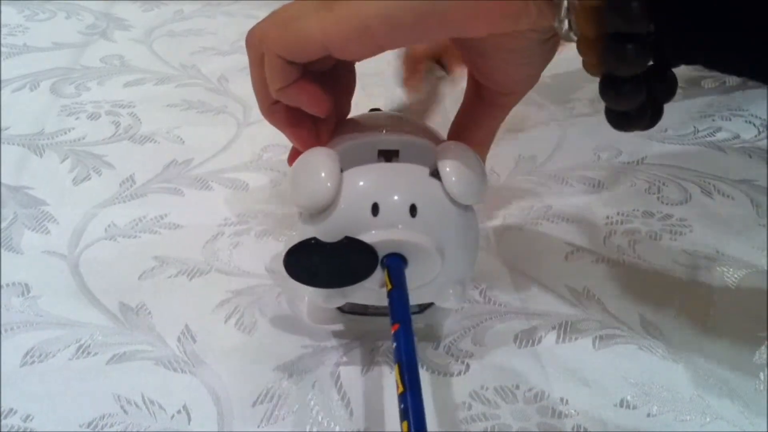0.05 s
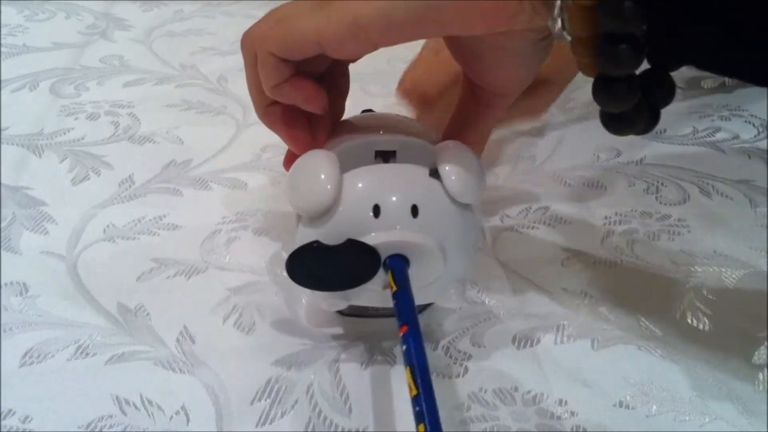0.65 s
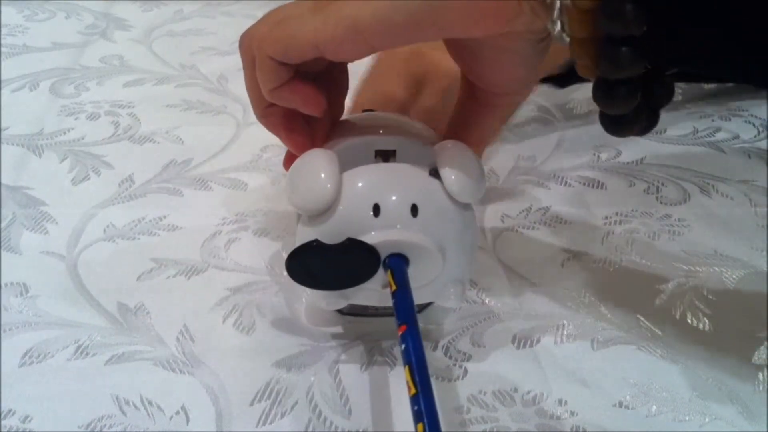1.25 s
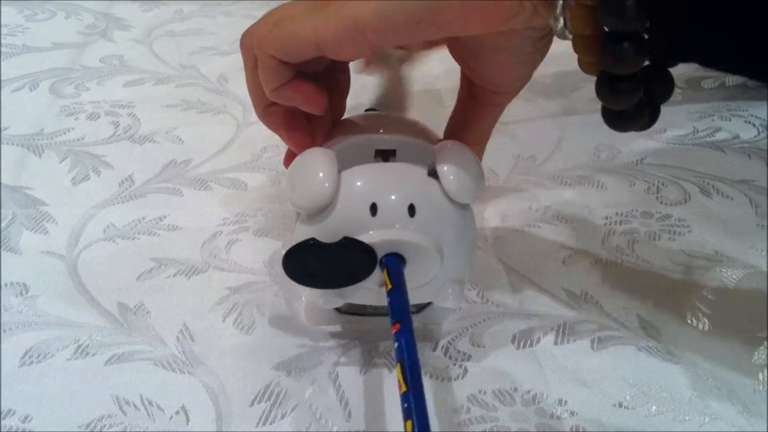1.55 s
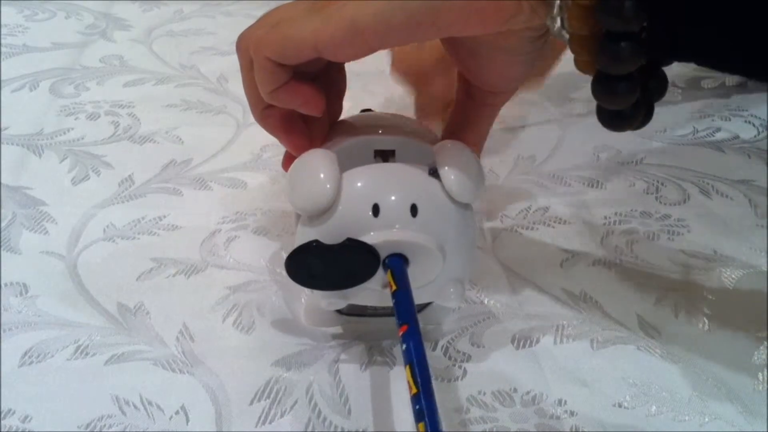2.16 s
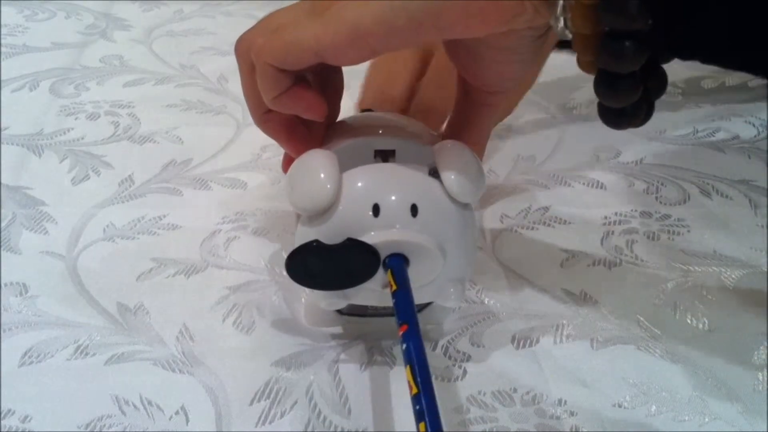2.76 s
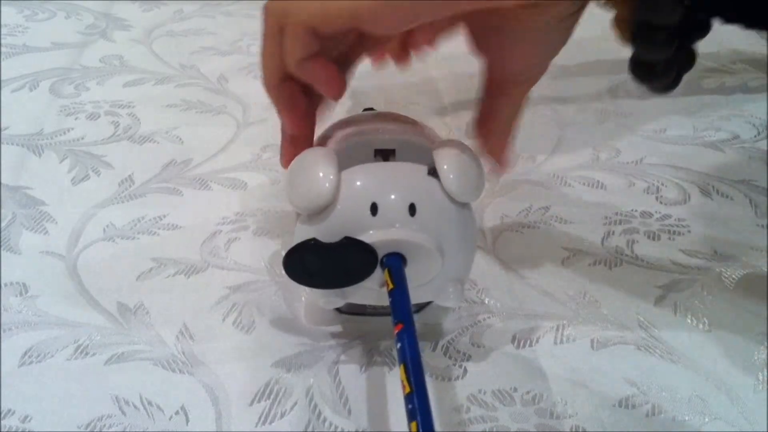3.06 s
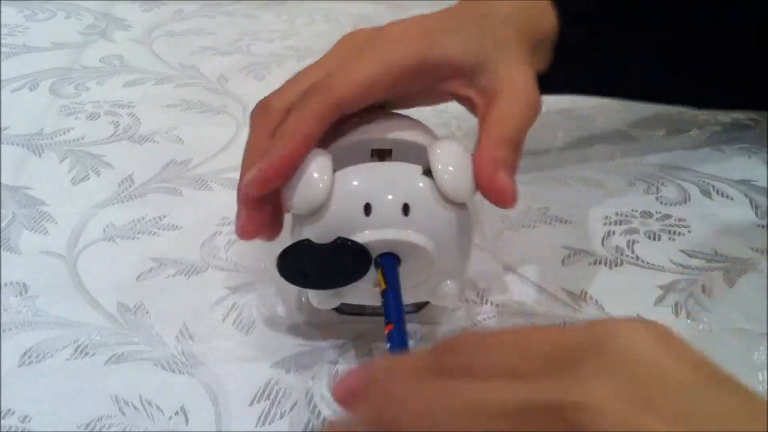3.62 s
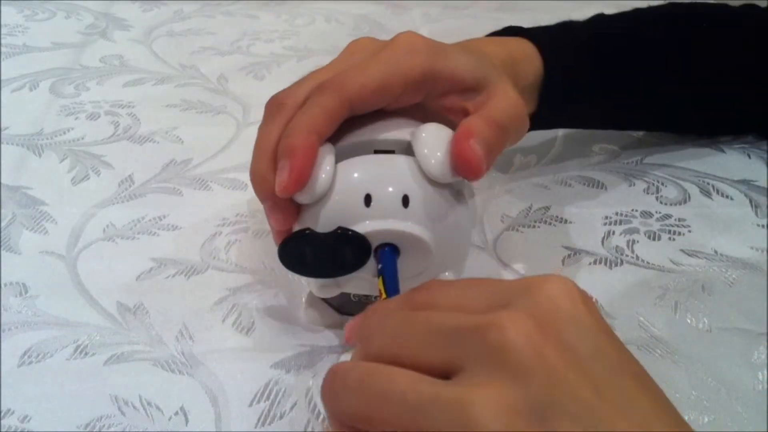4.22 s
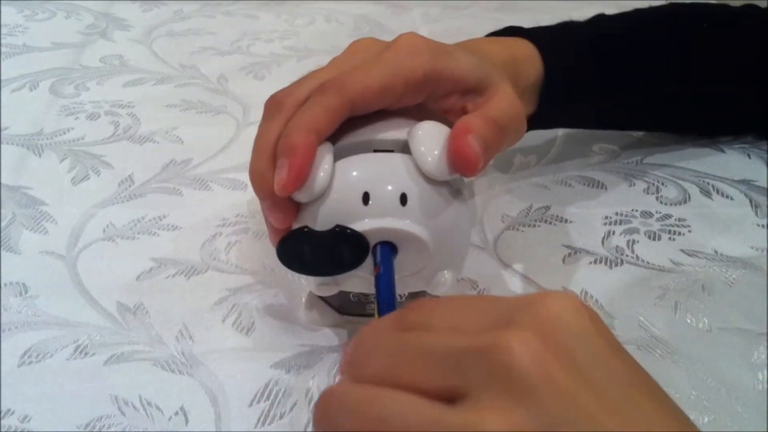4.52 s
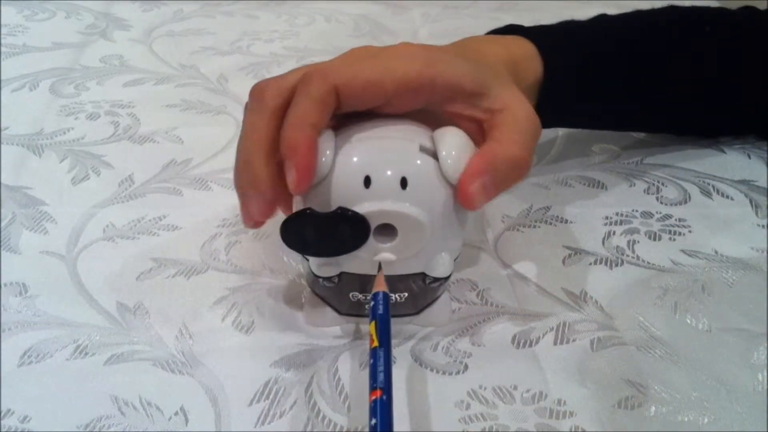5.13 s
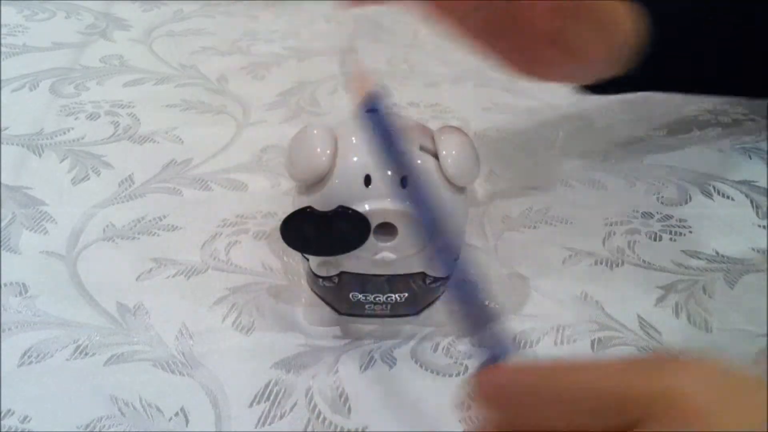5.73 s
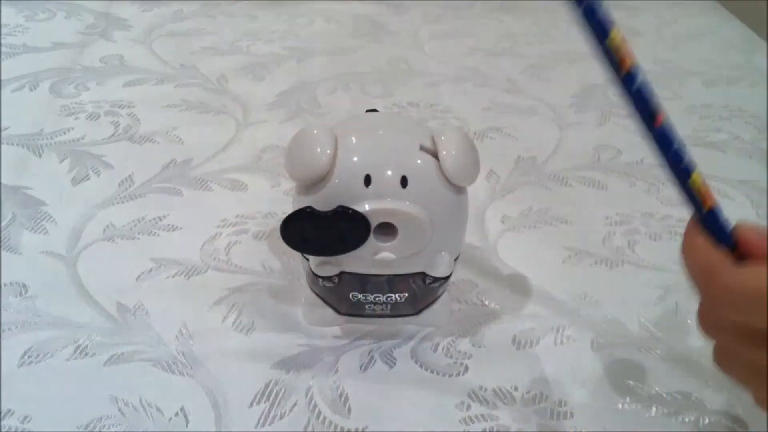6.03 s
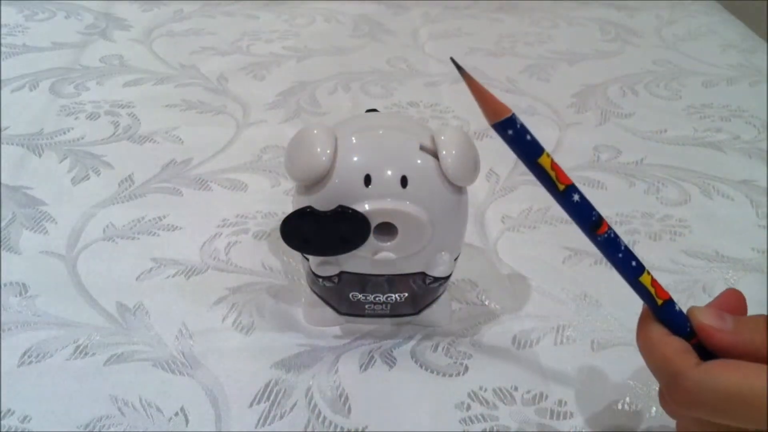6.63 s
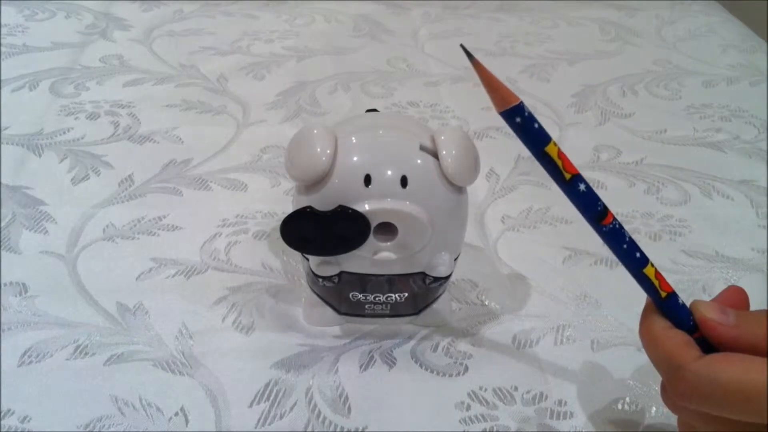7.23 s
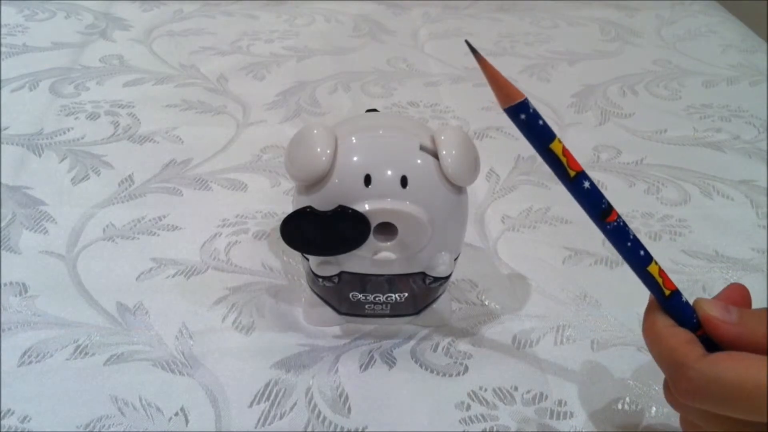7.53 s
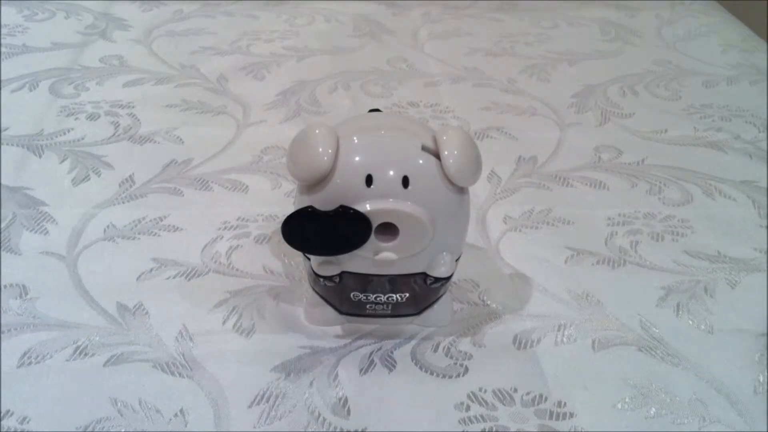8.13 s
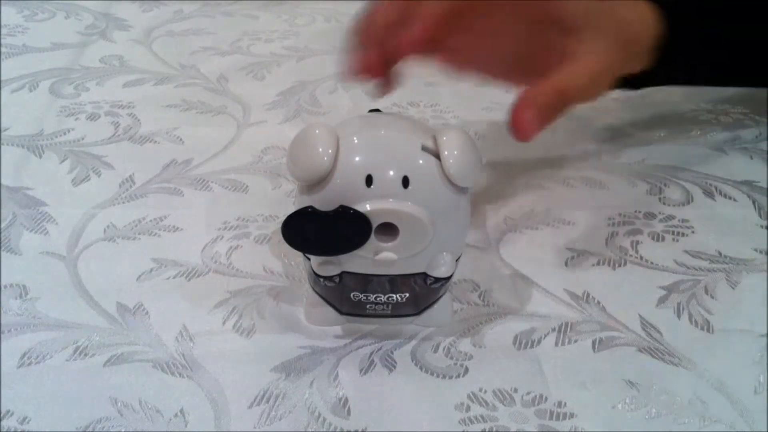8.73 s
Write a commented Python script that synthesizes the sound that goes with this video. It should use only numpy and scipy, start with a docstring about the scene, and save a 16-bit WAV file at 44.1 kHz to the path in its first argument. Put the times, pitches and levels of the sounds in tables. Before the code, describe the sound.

From the start, a hand-cranked plastic sharpener grinds a wooden pencil close to the microphone, at nearly three turns a second. The cutter rasps and crunches over a low judder, and the shell knocks irregularly, with a sharp crack near 1.9 seconds and busier rattling from 2.5. The grinding dies away at about 3 seconds. At 3.6 comes a tiny burst of sharp, dry ticks as a hand grips the pencil, then light taps and a faint creak around 4.3. Soft rubbing follows as the pencil slides out. Between 5.2 and 5.4 seconds the spring clamp snaps home in a quick cluster of bright clicks. After that it is quiet, with faint handling taps, a soft low table bump near 6.4 and a light tap with a brush at 8.6. A low, steady small-room hiss runs underneath, dropping out for an instant around 7.7 seconds.

```python
"""A small room with a steady hiss, the microphone close to a cloth-covered table.
A hand-cranked plastic sharpener grinds a pencil: the milling cutter circles the tip, tearing wood
fibres, juddering and knocking in its shell. After three seconds the crank stops. The spring clamp is
pressed, the pencil slides out and the clamp snaps home; a hand bumps the table.
Near the end the sound drops out for a moment."""
import sys
import numpy as np
from scipy import signal
from scipy.fft import rfft, irfft, next_fast_len
from scipy.io import wavfile
from scipy.ndimage import map_coordinates

SR = 44100
rng = np.random.default_rng(int(sys.argv[2]) if len(sys.argv) > 2 else 0)


def pcm_store(signal):
    """Save signal as 16-bit PCM."""
    levels = np.round(np.clip(np.atleast_2d(signal), -1, 1) * 32767)
    wavfile.write(sys.argv[1], SR, levels.astype(np.int16).T)


N = 395577
T = np.arange(N) / SR

# turns of the crank: start_s, carrier_ring_db (over the growl)
TURNS = [(-.05, -11), (0.321, -15), (.72, -4), (1.06, -14), (1.39, -13), (1.76, -7.5), (2.13, -10),
         (2.48, -10), (2.8, -24)]
# jolts of the crank: start_s, level_db, low_knock_db, bright_edge_db (both relative)
CRANK_KNOCKS = [(.351, -29, 4.5, -2), (.875, -32.5, 3, -7), (1.8931, -26, -4, 10.5), (1.932, -35.5, 0, -10),
                (2.519, -34.5, 0, -3), (2.599, -33, -1, 4), (2.742, -39, 6, 0), (2.7862, -31, 0, -5),
                (2.9166, -30, -3, -9)]
# resonances of the knocked plastic body: pitch_hz, width_hz, level_db
BODY_MODES = [(248, 27, -10), (498, 30, -8.5), (857, 32, 0), (1248, 84, 1), (1720, 60, -13), (2360, 250, 2)]
# resonances of the spring clamp: pitch_hz, width_hz, level_db
CLAMP_MODES = [(535, 840, -17), (760, 50, 0), (1360, 94, -7), (2400, 640, -16), (3600, 980, 3.5),
               (5900, 1600, 5), (7800, 1100, 1)]


def amp(db):
    """Decibels to gain."""
    return 10 ** (np.asarray(db) / 20)


def unit(x):
    """Scale to rms 1."""
    return x / np.sqrt(np.mean(x ** 2) + 1e-20)


def along(points, hz):
    """Read (hz, value) points on a log frequency axis."""
    f, values = np.transpose(points)
    return np.interp(np.log(hz + 1), np.log(f + 1), values)


def wobble(rate):
    """A smooth random curve, rate knots a second."""
    coarse = T[::32]
    knots = rng.standard_normal(int(N * rate / SR) + 4)
    return np.interp(T, coarse, map_coordinates(knots, [coarse * rate]))


def swell(top_s, half_s):
    """A smooth rise and fall."""
    return np.exp(-((T - top_s) / half_s) ** 2)


def filtered(x, response):
    """Pass x through a complex response of frequency."""
    size = next_fast_len(len(x) + 8192)
    return irfft(rfft(x, size) * response(np.fft.rfftfreq(size, 1 / SR)), size)[:len(x)]


def band(x, lo_hz, hi_hz):
    """Causal band-pass."""
    edges = [lo_hz, min(hi_hz, SR / 2 - 1)]
    return signal.sosfilt(signal.butter(3, edges, "band", fs=SR, output="sos"), x)


def resonances(modes, f):
    """Causal response of (pitch_hz, width_hz, level_db) modes."""
    return sum(amp(db) * 1j * f * width / (hz * hz - f * f + 1j * f * width) for hz, width, db in modes)


def narrow_noise(hz, width_hz):
    """Noise of rms 1 in a narrow band."""
    return unit(filtered(rng.standard_normal(N), lambda f: resonances([(hz, width_hz, 0)], f)))


def grains(rate, spread_db):
    """Tiny impulses of random size, about rate a second."""
    impulses = (rng.random(N) < rate / SR) * rng.standard_normal(N)
    return unit(impulses * amp(spread_db * rng.standard_normal(N)))


def crunchy(t, rate, depth_db):
    """Noise whose level jumps rate times a second, as small contacts follow one another."""
    jumps = np.interp(t * rate, np.arange(len(t)), rng.standard_normal(len(t)))
    return rng.standard_normal(len(t)) * amp(depth_db * jumps)


def add(track, start_s, x):
    """Mix x into the track."""
    part = track[round(start_s * SR):][:len(x)]
    part += x[:len(part)]


def room_tone():
    """Steady hiss with a faint, wavering room hum."""
    # colour of the hiss: frequency_hz, level_db
    colour = [(24, -67), (40, -30.5), (140, -12.5), (198, -7), (335, -11), (912, -17.5), (15800, -24.5)]
    hiss = unit(filtered(rng.standard_normal(N), lambda f: amp(along(colour, f))))
    return amp(-65.8) * hiss + amp(-77) * narrow_noise(hz=200, width_hz=6)


def crank_turns(last_turn_s=0.38):
    """Number of turns made so far."""
    starts = [s for s, _ in TURNS]
    return np.interp(T, starts + [starts[-1] + last_turn_s], np.arange(len(TURNS) + 1))


def digging(steepness=4.9):
    """Extra dB of growl, rasp and fizz: the cutter takes hold, stays in the wood and lets go."""
    # digs and skids: centre_s, growl_db, rasp_db, fizz_db, half_length_s
    digs = [(0.115, 4, 3, 6.5, 0.047), (0.302, 5.5, 4, 3.5, 0.087), (0.426, 3.5, 6, 9, 0.049),
            (0.638, 4.5, 1, 0, 0.079), (0.903, 4, 7.5, 4, 0.036), (1, -4.5, -2.5, -3, 0.043),
            (1.176, -3.5, 1, -1, 0.095), (1.626, 5.5, 6, 1, 0.04), (1.708, -3, -3, -3, 0.04),
            (1.897, 6, 5.5, 5, 0.047), (2.125, 4.5, 0, -1, 0.039), (2.38, 4.5, 4.5, 1, 0.032),
            (2.625, 6.5, 7.5, 12, 0.053)]
    coarse = T[::32]
    shapes = np.array([np.exp(-np.abs((coarse - s) / half) ** steepness) for s, *_, half in digs])
    return [np.interp(T, coarse, extra_db @ shapes) for extra_db in np.transpose(digs)[1:-1]]


def drive(take_hold_s=0.11, ease_s=2.573, stop_s=2.97, coast_db_per_s=130, ring_phase=0.16):
    """Gains of table rumble, shell growl, carrier ring, fibre rasp and fizz follow effort and digs."""
    # how hard the hand drives the cutter: time_s, level_db
    effort = [(0.0, -37.5), (0.2, -43), (0.4, -43.5), (0.54, -47), (0.84, -46), (0.98, -47.5),
              (1.21, -43.5), (1.42, -49), (1.6, -50), (2.28, -51.5), (2.7, -52.5), (2.8, -42.5)]
    times, levels = np.transpose(effort)
    push_db = np.interp(T, times, levels - levels.mean())
    run_db = levels.mean() - 4 * np.exp(-T / take_hold_s) - coast_db_per_s * np.maximum(T - stop_s, 0)
    eased_s = np.maximum(T - ease_s, 0)  # each part sags at its own rate as the hand eases off
    rumble_db = run_db - 4.5 + 0.82 * push_db - 27 * eased_s
    growl_db = run_db - 1 + push_db - 38.6 * eased_s
    rasp_db = run_db - 5 + 0.61 * push_db - 39 * eased_s
    fizz_db = run_db - 11.5 + 0.8 * push_db - 43 * eased_s
    # the cutter's carrier rings most at one place in each turn
    turn = crank_turns()
    turn_db = np.interp(turn, np.arange(len(TURNS)) + ring_phase, [db for _, db in TURNS])
    ring_db = growl_db + turn_db + 3 * (np.cos(2 * np.pi * (turn - ring_phase)) - 1)
    dig_growl, dig_rasp, dig_fizz = digging()
    return (amp(rumble_db + 0.71 * dig_growl), amp(growl_db + dig_growl), amp(ring_db + dig_rasp),
            amp(rasp_db + dig_rasp), amp(fizz_db + dig_fizz))


def chamber(fibres, seating_s=(0.5, 0.81), sink_turns=0.29, handover_turns=0.25):
    """Each turn a flute opens along the pencil: the chamber's resonances sink until the next takes over."""
    # hollow peaks and dips: blunt_tip_hz, seated_tip_hz, half_width_hz, gain_db, starting_lift_share
    hollows = [(3300, 3140, 330, -2, 0.011), (4130, 3890, 330, 6, 0.077), (4800, 6300, 570, 2.5, 0.088),
               (6440, 5940, 540, -1.5, 0.0058), (7880, 8450, 480, 8.5, 0.13), (11700, 10900, 360, -10, 0),
               (11800, 12200, 600, 7, 0.034), (14400, 15100, 650, 4, .02)]
    hz, t, spectrum = signal.stft(fibres, SR, nperseg=256)
    turn = np.interp(t, T, crank_turns())
    seated = np.interp(t, seating_s, [0, 1])
    flute_age = turn - np.round(turn)
    fresh = 0.5 + 0.5 * np.tanh(flute_age / handover_turns)
    gain_db = np.zeros(spectrum.shape)
    for blunt_hz, seated_hz, width_hz, db, lift in hollows:
        waver = 1 + 0.017 * np.interp(t, T, wobble(6.4))
        rest_hz = (blunt_hz + (seated_hz - blunt_hz) * seated) * waver
        depth_db = db * (1 + 0.34 * np.interp(t, T, wobble(18)))
        for age, share in ((flute_age, fresh), (flute_age + 1, 1 - fresh)):
            centre_hz = rest_hz * (1 + lift * np.exp(-(np.maximum(age, 0) / sink_turns) ** 2))
            gain_db += depth_db * share * np.exp(-((hz[:, None] - centre_hz) / width_hz) ** 2)
    return signal.istft(spectrum * amp(gain_db), SR, nperseg=256)[1][:N]


def grinding(bite_hz=31, judder_db=1.0, uneven_db=1.4):
    """The cutter's edges bite in turn; each bite tears a shower of fibres that shakes the shell."""
    # broad colour of the cutting: frequency_hz, level_db
    colour = [(50, -39), (92, -32), (122, -12), (250, -1), (420, -5), (900, -2.5), (1650, -9),
              (2100, -11.5), (3200, -13), (4250, -14), (4900, -16.5), (7400, -17), (9500, -16.5),
              (10600, -19), (12600, -22), (16000, -22)]
    # resonances of the shell on the table: pitch_hz, width_hz, level_db
    shell_modes = [(137, 7, 4), (167, 10, 4), (237, 22, 2), (340, 14, 4), (488, 24, 6), (672, 30, -3),
                   (760, 90, 0), (885, 35, -2), (1278, 50, -3), (1428, 50, -4)]
    rumble, growl, ring, rasp, fizz = drive()
    bite = np.sin(2 * np.pi * np.cumsum(bite_hz * (1 + 0.088 * wobble(3.41))) / SR)
    force_db = judder_db * bite + uneven_db * wobble(70)
    force_db += 0.2538 * digging()[1] * wobble(170)  # digging in roughens the bites
    fibres = filtered(grains(rate=14000, spread_db=0.5), lambda f: amp(along(colour, f)))
    # the heavy parts follow the judder fully, the fine rasp slightly less
    blows = fibres * amp(force_db)
    fine = chamber(fibres * amp(0.91 * force_db))
    # the grip on the shell shifts, so its resonances take turns while their total stays even
    grip = amp(1.5 * np.array([wobble(8.95) for _ in shell_modes]))
    grip /= np.sqrt(np.mean(grip ** 2, axis=0))
    shell = sum(gain * filtered(blows, lambda f: resonances([mode], f))
                for gain, mode in zip(grip, shell_modes))
    body = blows + amp(-0.5) * shell
    low = unit(filtered(body, lambda f: f < 400))
    middle = unit(filtered(body, lambda f: (f >= 400) & (f < 1700)))
    high = unit(filtered(fine, lambda f: (f >= 1700) & (f < 11200)))
    top = unit(filtered(fine, lambda f: f >= 11200))
    shaking = rng.standard_normal(N) * amp(force_db)
    carrier = unit(filtered(shaking, lambda f: resonances([(2478, 200, 0)], f) ** 2))
    return rumble * low + growl * middle + ring * carrier + rasp * high + fizz * top


def pings():
    """A bite or hard catch leaves one part ringing briefly; low parts are slower to start."""
    # ringing parts: start_s, pitch_hz, level_db, t60_s
    catches = [(0.096, 490, -33, 0.13), (0.262, 243, -31, 0.13), (0.303, 241, -34.5, 0.14),
               (0.59, 852, -28, 0.06), (0.897, 763, -27, 0.068), (1.894, 2560, -19.5, 0.028),
               (3.038, 5430, -53, 0.065), (4.375, 5700, -44, 0.018), (5.213, 257, -45.5, 0.25),
               (5.227, 3080, -32.5, 0.018), (5.3162, 2340, -29, 0.022), (5.3179, 6060, -27.5, 0.018),
               (5.3168, 7170, -30.5, 0.019), (5.3256, 1220, -26, 0.03)]
    out, t = np.zeros(N), np.arange(SR // 5) / SR
    for s, hz, db, t60 in catches:
        envelope = amp(db - 60 * t / t60) * (1 - np.exp(-t * hz))
        add(out, s, envelope * np.sin(2 * np.pi * hz * t))
    return out


def chatter(t60_s=0.037, attack_s=0.00092):
    """The cutter's edges snag and set their carrier buzzing for a moment."""
    # snags: start_s, peak_db
    snags = [(0.229, -34), (0.792, -35), (.84, -31.5), (1.171, -35), (1.833, -38), (2.203, -40),
             (2.496, -40), (2.52, -39), (2.539, -37), (2.561, -37), (2.582, -37), (2.599, -35),
             (2.618, -34), (2.63, -31.5), (2.643, -40), (2.967, -47), (3.017, -46), (3.035, -40)]
    # resonances of the carrier: pitch_hz, width_hz, level_db
    carrier_modes = [(2500, 280, 0), (1260, 80, -1), (3850, 900, -13)]
    out, t = np.zeros(N), np.arange(SR // 10) / SR
    envelope = amp(-60 * t / t60_s) * (1 - np.exp(-t / attack_s))
    for s, db in snags:
        scrape = crunchy(t, rate=690, depth_db=5) * envelope
        buzz = filtered(scrape, lambda f: resonances(carrier_modes, f))
        add(out, s, amp(db) * buzz / np.abs(buzz).max())
    return out


def table_booms():
    """The table's soft, low booms swell and fade with an unsteady pitch."""
    # booms: top_s, pitch_hz, level_db, half_length_s
    booms = [(0.305, 165, -48.5, 0.1), (1.82, 168, -51.5, 0.086), (6.384, 137.4, -61.5, 0.095),
             (6.39, 254, -65.5, 0.038)]
    return sum(amp(db) * swell(s, half) * unit(np.sin(2 * np.pi * hz * T + wobble(45)))
               for s, hz, db, half in booms)


def hits(rows, decay_s, modes, knock_life, edge_life, split_hz, edge_hz, thud_db):
    """Plastic and steel collide and rattle in four bands; a band's t60 is decay_s times its life."""
    out, t = np.zeros(N), np.arange(SR // 5) / SR
    attack = 1 - np.exp(-t / 0.00025)
    for s, db, knock_db, edge_db in rows:
        bands = [(110, 283, thud_db + knock_db, knock_life), (196, 2200, knock_db + 1.5, knock_life),
                 (1470, split_hz, 0.016, 0.79), (4600, edge_hz, edge_db, edge_life)]
        for lo_hz, hi_hz, band_db, life in bands:
            rattle = rng.standard_normal(len(t)) * amp(-60 * t / (decay_s * life)) * attack
            part = band(filtered(rattle, lambda f: 1 + resonances(modes, f)), lo_hz, hi_hz)
            add(out, s, amp(db + band_db - 4) * part / np.abs(part).max())
    return out


def knocks():
    """The crank jolts: a short crack, then the plastic body rings."""
    rings, t = np.zeros(N), np.arange(SR // 5) / SR
    attack = 1 - np.exp(-t / 0.0005)
    for s, db, _, _ in CRANK_KNOCKS:
        ring = sum(amp(level) * np.exp(-np.pi * width * t) * np.sin(2 * np.pi * (hz * t + rng.random()))
                   for hz, width, level in BODY_MODES)
        add(rings, s, amp(db - 9) * ring * attack)
    cracks = hits(CRANK_KNOCKS, 0.026, BODY_MODES, knock_life=3.0, edge_life=0.55,
                  split_hz=3700, edge_hz=10700, thud_db=-11)
    return rings + amp(-3) * cracks


def splinters(t60_s=0.14):
    """Every knock of the crank crushes a few fibres, which crunch on through the body."""
    crunch, t = np.zeros(N), np.arange(SR // 5) / SR
    for s, db, _, _ in CRANK_KNOCKS:
        add(crunch, s, amp(db - 12 - 60 * t / t60_s) * crunchy(t, rate=500, depth_db=5))
    return band(filtered(crunch, lambda f: 0.27 + resonances(BODY_MODES, f)), 320, 2500)


def clamp_clicks():
    """The clamp opens and snaps home; the pencil is handled and put down."""
    # snaps of the spring clamp: start_s, level_db, low_knock_db, bright_edge_db (both relative)
    snaps = [(5.211, -27, -2.5, -5), (5.2267, -28, -18, 0.5), (5.316, -23.5, -8, -2.5),
             (5.3235, -19.5, -8.5, -9), (5.3668, -26.5, -4, 0)]
    # light taps of fingers and pencil: start_s, level_db, low_knock_db, bright_edge_db (likewise)
    taps = [(3.2366, -46.5, -5, 4), (4.2785, -33, -6, -7), (4.3173, -37.5, -10.5, -5),
            (4.3423, -38.5, -4, -5), (4.3745, -37.5, -16, -11), (5.828, -50, 0.5, -12),
            (6.278, -47, -10, -10), (6.5424, -51, -19, 4), (8.582, -38.5, -2, 0.5)]
    return sum(hits(rows, decay_s, CLAMP_MODES, knock_life=2.94, edge_life=1.0,
                    split_hz=6300, edge_hz=16500, thud_db=-16.5)
               for rows, decay_s in ((snaps, 0.022), (taps, 0.034)))


def crackle(tick_t60_s=0.00073, fizz_t60_s=0.05):
    """The hand closes on the pencil: needle-sharp dry ticks, each trailing a little fizz."""
    # ticks: start_s, level_db
    ticks = [(3.6, -23.5), (3.6037, -21.5), (3.6051, -24), (3.6103, -36)]
    out, t = np.zeros(N), np.arange(SR // 20) / SR
    tick = amp(-60 * t / tick_t60_s) * np.cos(2 * np.pi * 9500 * t)
    for s, db in ticks:
        fizz = amp(-20 - 60 * t / fizz_t60_s) * rng.standard_normal(len(t))
        add(out, s, amp(db) * (band(tick, 1500, SR / 2) + band(fizz, 5400, 16000)))
    return out


def rubbing():
    """Small slips of skin, wood and plastic, coloured by the clamp; each stroke grows and dies away."""
    # strokes of fingers, clamp and pencil: top_s, level_db, rise_s, fall_s
    strokes = [(3.82, -64.5, 0.088, 0.078), (4.32, -57.5, 0.07, 0.05), (4.73, -60.5, 0.087, 0.083),
               (4.99, -66, 0.12, 0.15), (5.191, -58, 0.044, 0.27), (8.41, -68, .03, 0.069),
               (8.59, -60.5, 0.028, 0.043)]
    # colour of the friction: frequency_hz, level_db
    colour = [(240, -57), (400, -38), (756, 1.5), (1070, 1.5), (3660, -10.5), (15000, -19.5)]
    slips = grains(rate=2000, spread_db=1.0)
    friction = filtered(slips, lambda f: amp(along(colour, f)) * (1 + resonances(CLAMP_MODES, f)))
    envelope = sum(amp(db) * np.exp(-np.maximum((s - T) / rise, (T - s) / fall))
                   for s, db, rise, fall in strokes)
    return unit(friction) * envelope


def creaks():
    """The pencil creaks faintly in the clamp: scratchy squeaks that swell and fade."""
    # squeaks: top_s, pitch_hz, level_db, half_length_s
    squeaks = [(4.326, 759, -58.5, 0.045), (4.328, 3630, -57, 0.025), (4.715, 5200, -69, 0.05)]
    return sum(amp(db) * swell(s, half) * narrow_noise(hz, 0.05 * hz) for s, hz, db, half in squeaks)


def room(x):
    """The walls' diffuse answer arrives 5 ms late; the treble dies first."""
    # decay of the room: frequency_hz, t60_s
    decay = [(200, 0.88), (2000, 0.53), (6000, 0.41), (14000, 0.27)]
    hz, t, spectrum = signal.stft(rng.standard_normal(SR // 2), SR, nperseg=256)
    tail = signal.istft(spectrum * amp(-60 * t / along(decay, hz)[:, None]), SR, nperseg=256)[1]
    tail = np.pad(tail, (SR // 200, 0))
    return signal.fftconvolve(x, tail / np.linalg.norm(tail))[:N]


def scene():
    """Sharpener and hands close to one microphone, the walls well behind them in level."""
    crank = grinding() + chatter() + splinters() + knocks()
    hands = rubbing() + creaks() + table_booms()
    clamp, ticks, ringing = clamp_clicks(), crackle(), pings()
    walls = room(amp(-10) * crank + amp(-9.5) * hands + amp(-9) * clamp
                 + amp(-11) * ticks + amp(-16.5) * ringing)
    return (crank + hands + clamp + ticks + ringing + walls + room_tone())[None]


def record(dry):
    """The sound drops out once for a moment; nothing passes above the band limit."""
    dip_start_s, dip_end_s, top_hz = 7.719, 7.767, 15900
    gain = np.where((T > dip_start_s) & (T < dip_end_s), amp(-24.5), 1)
    return filtered(dry[0] * gain, lambda f: f < top_hz)[None]


dry = scene()
out = record(dry)
pcm_store(out)
```